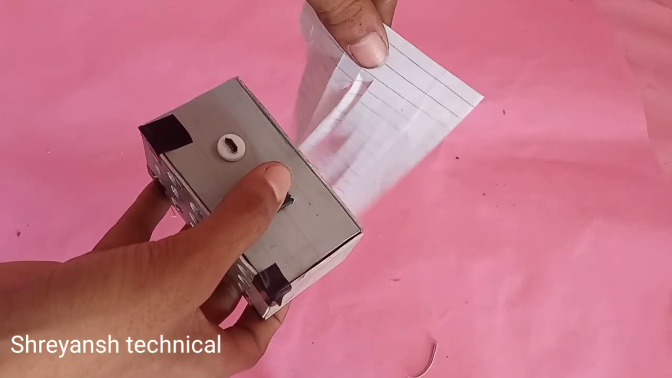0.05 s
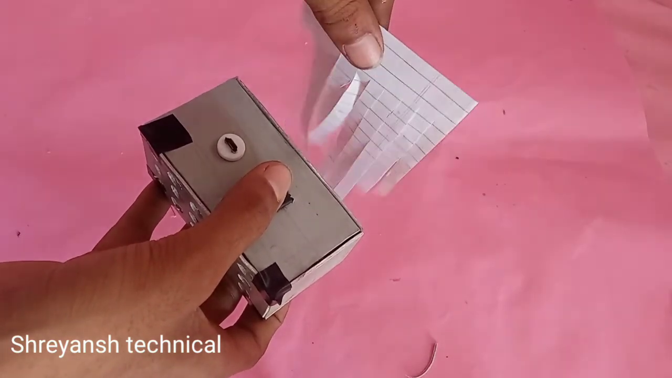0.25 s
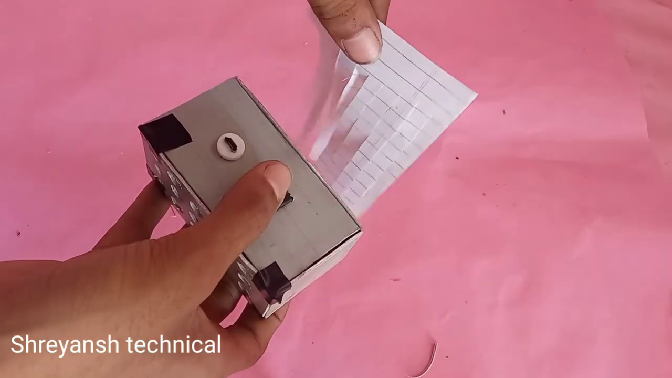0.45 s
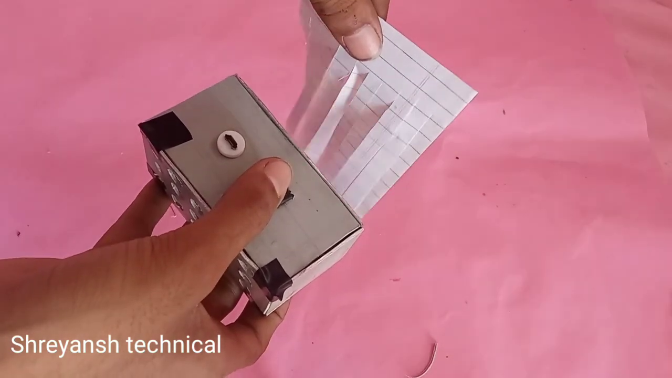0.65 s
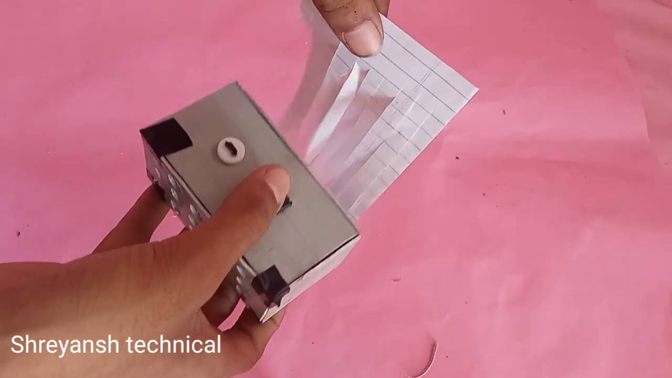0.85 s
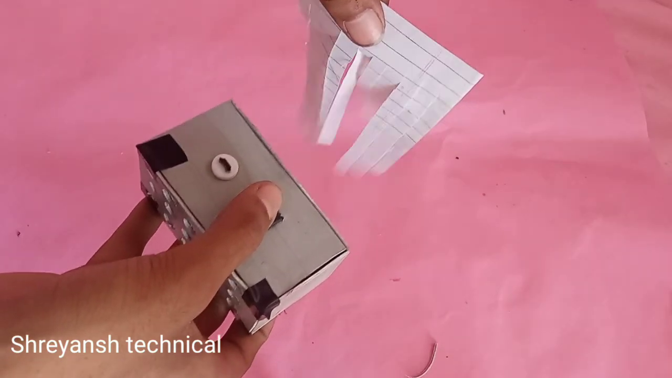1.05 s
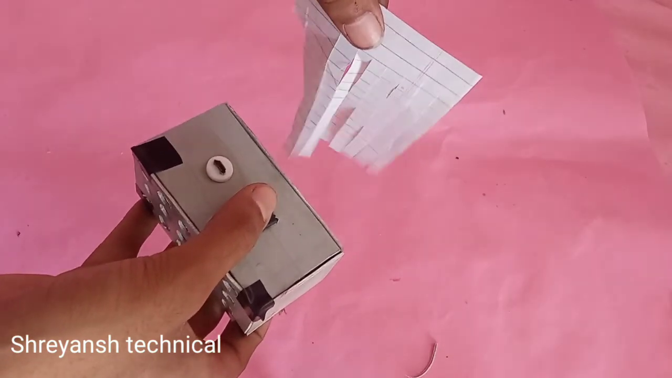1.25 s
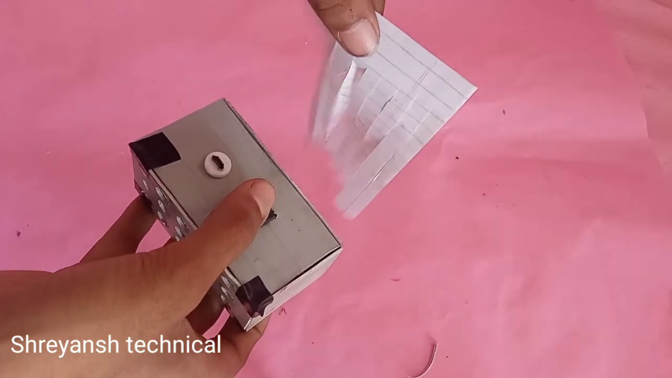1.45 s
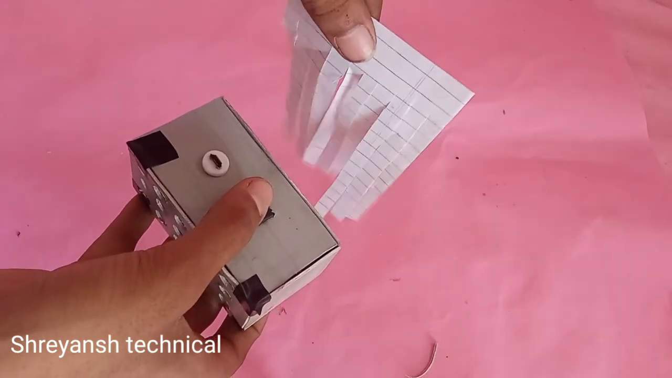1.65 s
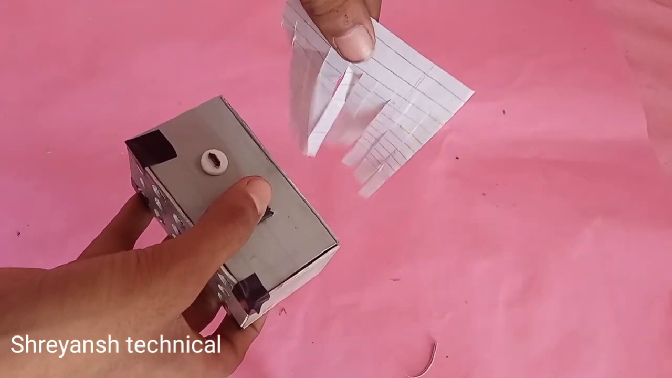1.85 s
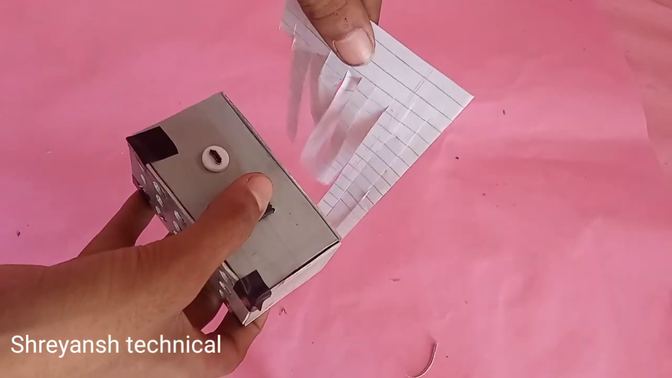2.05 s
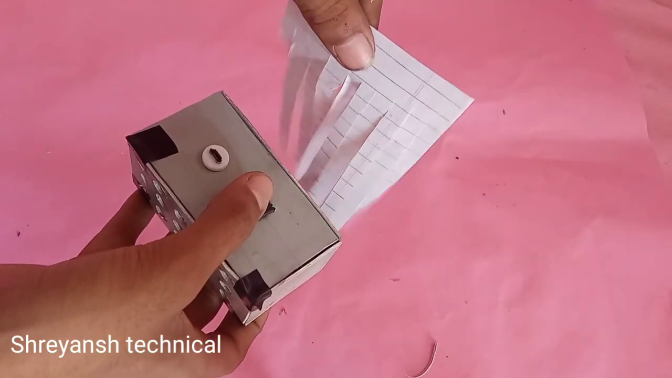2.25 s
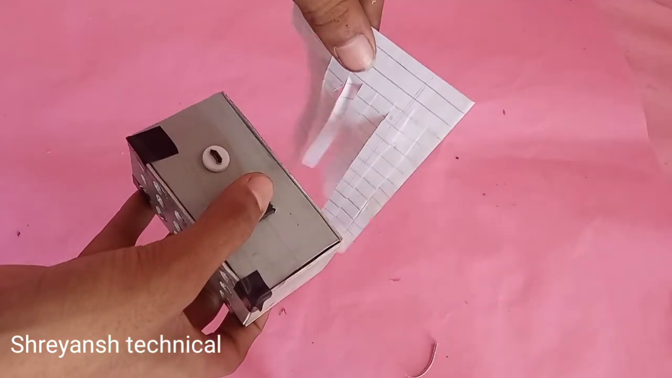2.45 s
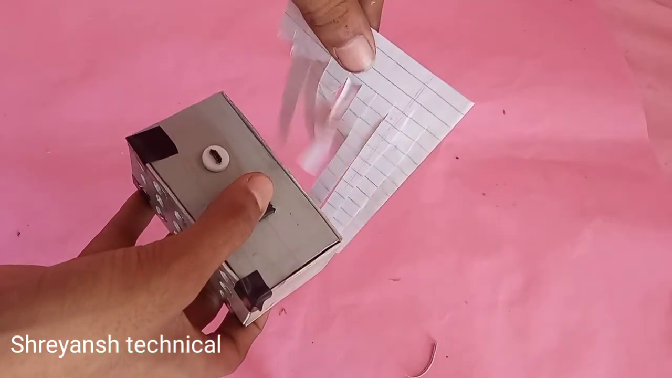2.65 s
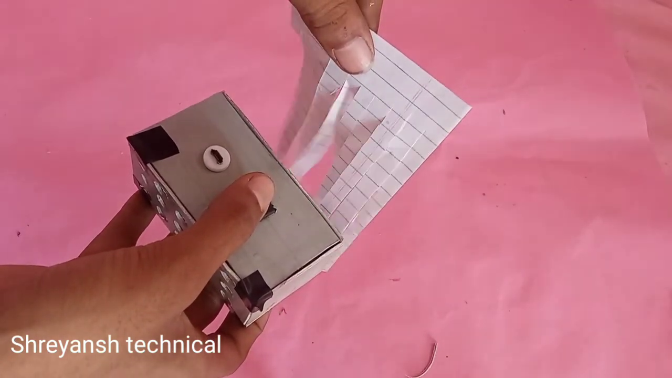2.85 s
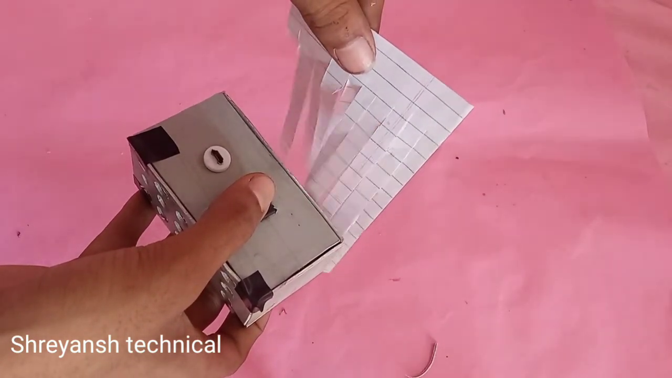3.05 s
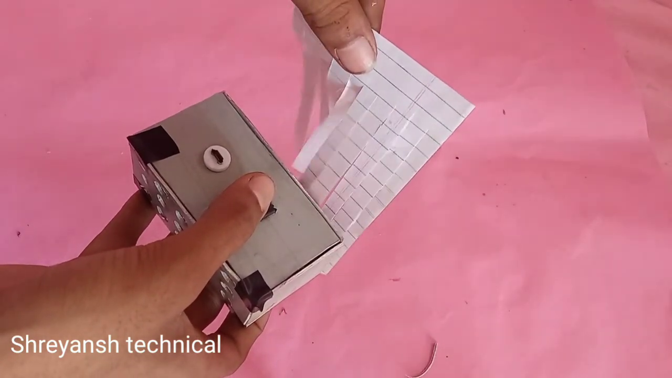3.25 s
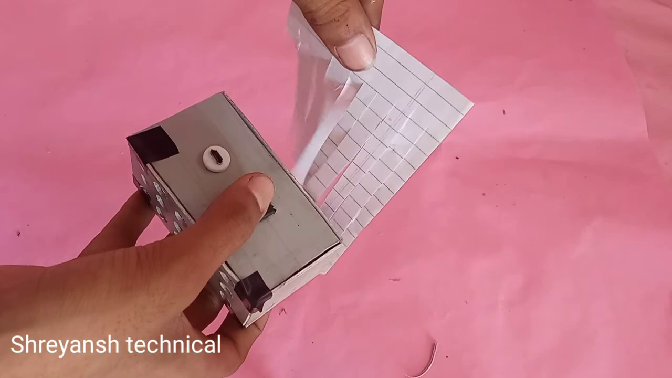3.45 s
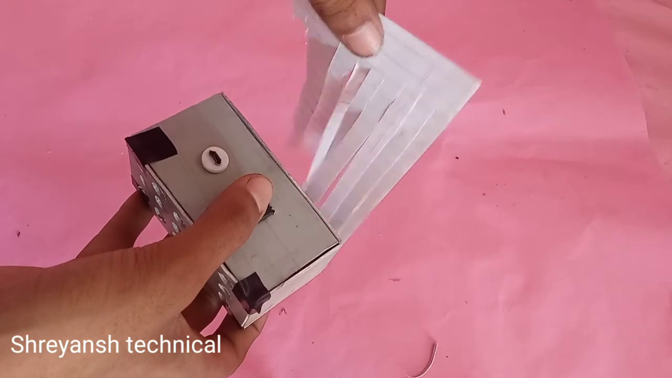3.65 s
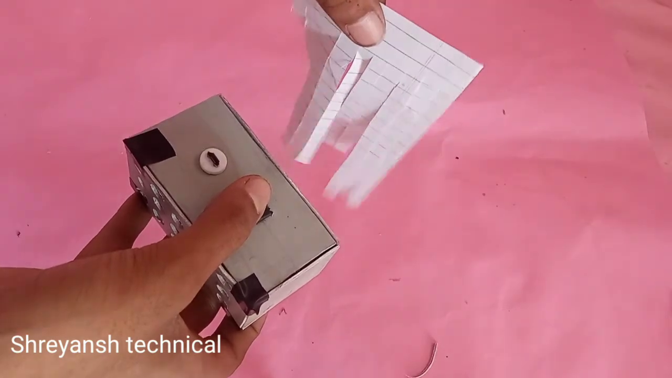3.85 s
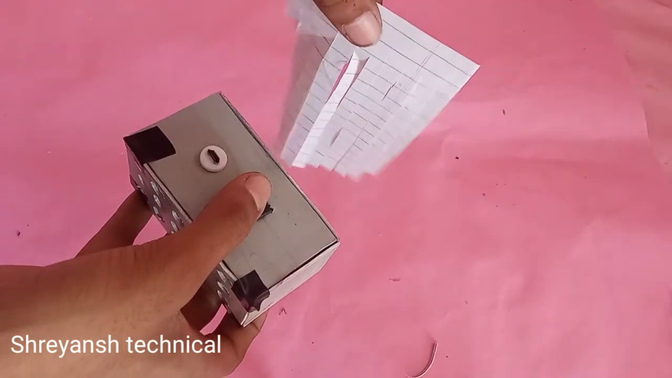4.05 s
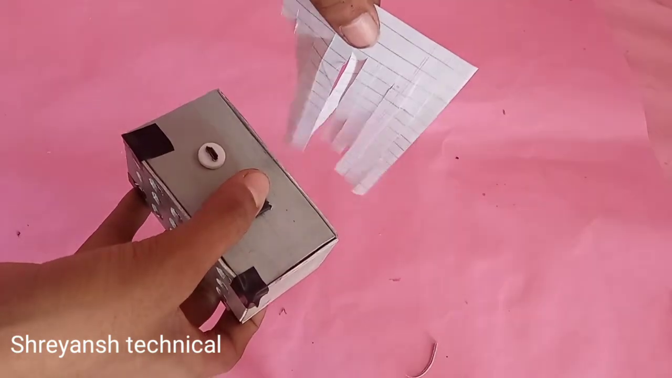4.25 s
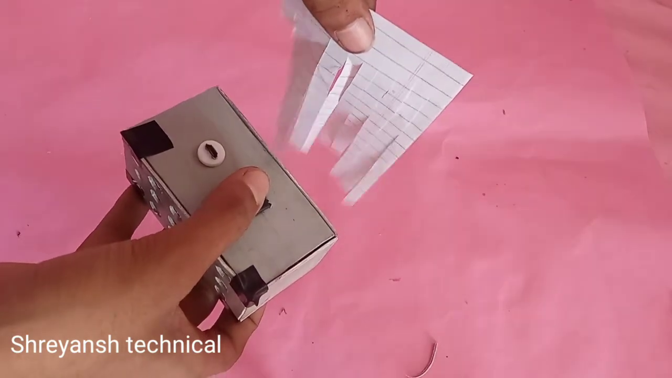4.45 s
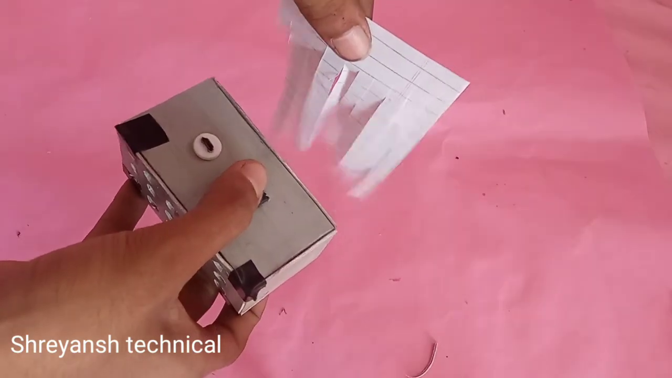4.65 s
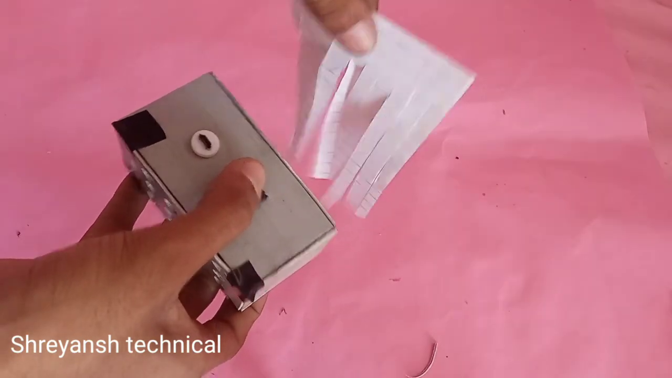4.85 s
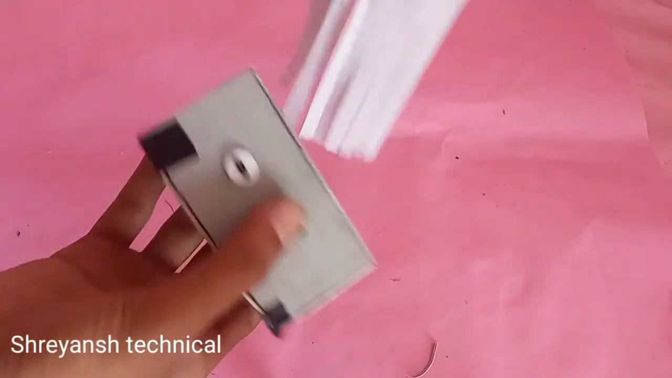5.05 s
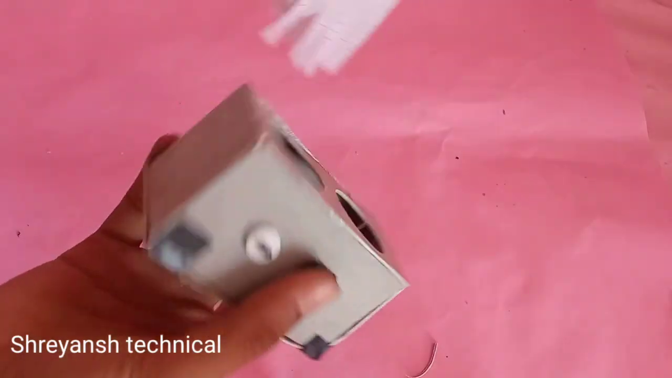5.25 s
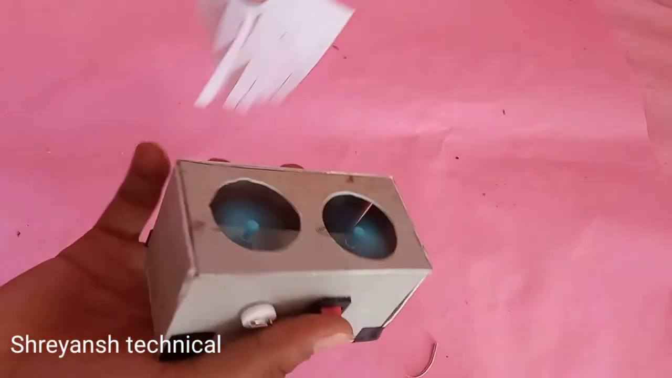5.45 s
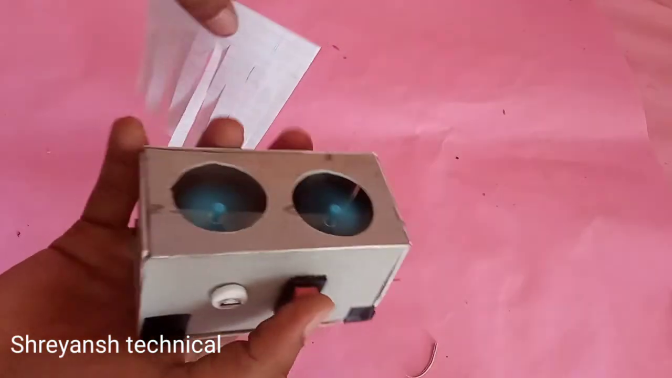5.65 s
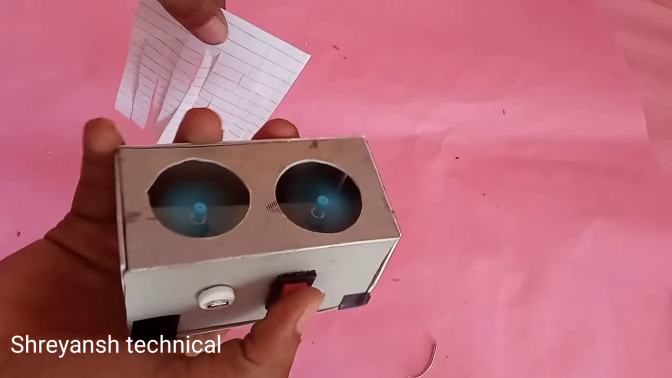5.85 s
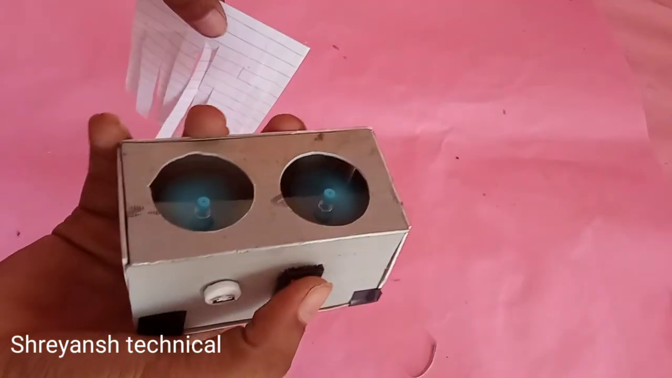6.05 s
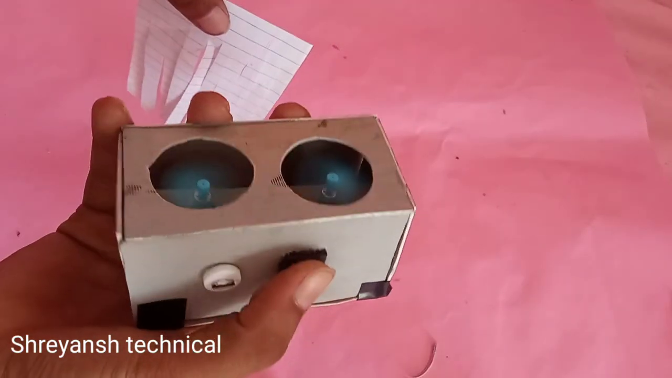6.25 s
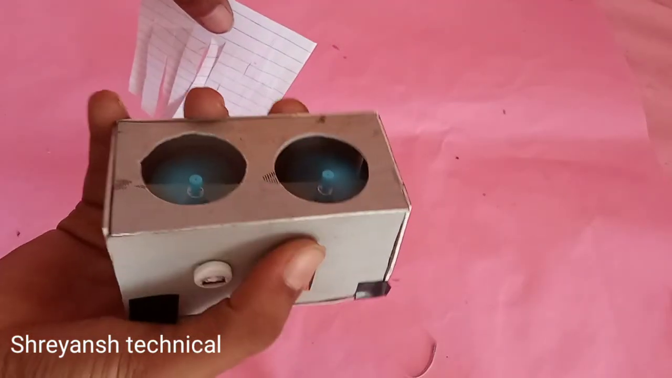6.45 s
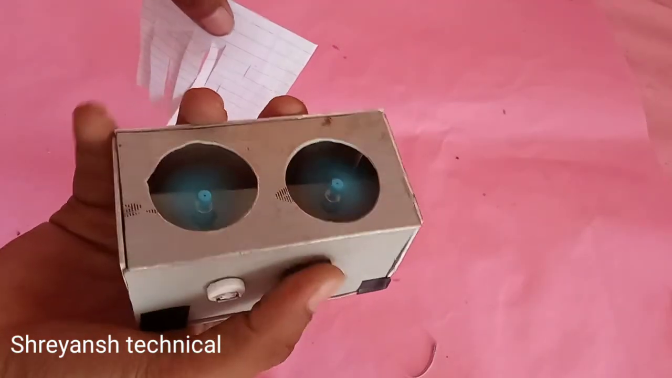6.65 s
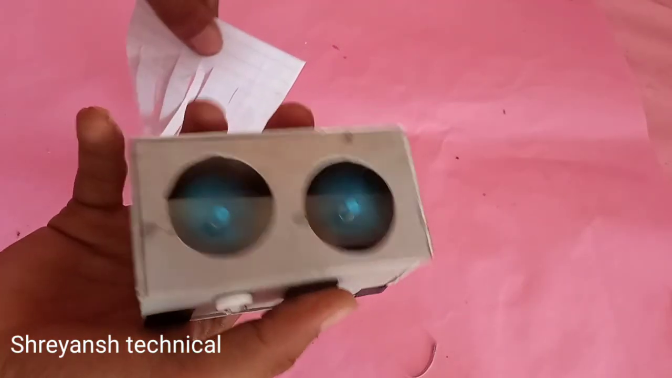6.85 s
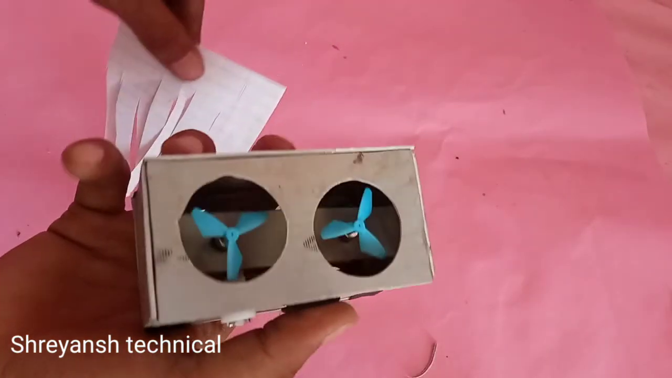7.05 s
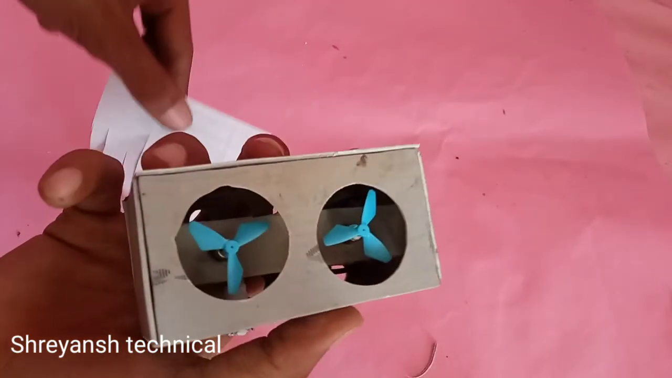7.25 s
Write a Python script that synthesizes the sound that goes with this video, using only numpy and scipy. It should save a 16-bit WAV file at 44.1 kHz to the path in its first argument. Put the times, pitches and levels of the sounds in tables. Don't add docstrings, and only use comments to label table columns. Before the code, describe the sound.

A small twin-fan box buzzes close by with a wavering, beating drone and airy hiss, then snaps off, coasts down and leaves brief paper rustling.

```python
import sys
import numpy as np
from scipy import signal
from scipy.fft import rfft, irfft, next_fast_len
from scipy.io import wavfile
from scipy.ndimage import uniform_filter1d

SR = 44100
rng = np.random.default_rng(int(sys.argv[2]) if len(sys.argv) > 2 else 0)


def put_to_file(sound):
    columns = np.atleast_2d(sound).T
    safe = np.clip(columns, -1, 1)
    whole_steps = np.round(safe * 32767)
    wavfile.write(sys.argv[1], SR, whole_steps.astype(np.int16))


def invert_db(level):
    return 10 ** (np.asarray(level, dtype=float) / 20)


N = 321930
TIME = np.arange(N) / SR
OFF_S = 6.445
AIR_LAW_DB = 50.0


def evened(x):
    return x / np.sqrt(np.mean(abs(x) ** 2) + 1e-20)


def read(points, hz):
    f, value = np.transpose(points)
    return np.interp(np.log(hz + 1), np.log(f + 1), value)


def columns(rows, t=TIME):
    s, *values = np.transpose(rows)
    return [np.interp(t, s, v) for v in values]


def humps_db(table, hz):
    return sum(db / (1 + (2 * (hz - f) / width) ** 2) for f, width, db in table)


def bump(centre_s, half_s):
    return np.exp(-((TIME - centre_s) / half_s) ** 2)


def band(x, lo_hz, hi_hz, order=2):
    return signal.sosfilt(signal.butter(order, [lo_hz, hi_hz], "band", fs=SR, output="sos"), x)


def wander(width_hz, size=N):
    step = max(int(SR / width_hz / 40), 1)
    r = np.exp(-np.pi * width_hz * step / SR)
    white = rng.standard_normal((size // step + 2, 2)) @ [1, 1j]
    z = evened(signal.lfilter([1], [1, -2 * r, r * r], white))
    return np.interp(np.arange(size) / step, np.arange(len(z)), z)


def hiss(field_db, patchy_db, flicker_db):
    frames = N // 128 + 5
    hz = np.fft.rfftfreq(512, 1 / SR)[:, None]
    t = np.arange(frames) * 128 / SR
    a, b, patches = rng.standard_normal((frames, 257, 3)).T
    patches = evened(uniform_filter1d(uniform_filter1d(patches, 8, 0), 14, 1))
    flicker = evened(uniform_filter1d(rng.standard_normal(frames), 8))
    z = (a + 1j * b) * invert_db(field_db(hz, t) + patchy_db * patches + flicker_db * flicker)
    return signal.istft(z, nperseg=512, noverlap=384)[1][:N]


# frequency in Hz, level in dB per Hz.
HOUSE_MURMUR = [(24, -50), (40, -24), (167, -9.5), (203, -4.5), (467, -12), (527, -25), (685, -14),
                (790, -21.5), (1190, -26), (1300, -25), (12000, -46), (15600, -77), (22000, -120)]
# time in seconds, half width in seconds, level in dB.
TABLE_JOLTS = [
    (6.55, .09, -65),
    (6.845, 0.037, -63),
]
# start in seconds, length in seconds, pitch in Hz, width in Hz, level in dB.
HAND_CREAKS = [(7.15, .15, 203, 24.8, -70), (7.19, 0.08, 1170, 30, -85), (7.21, .04, 690, 40, -86),
               (7.27, .03, 740, 60, -92.5), (7.18, .05, 9500, 900, -92), (7.27, .03, 9300, 600, -90),
               (7.25, .05, 4500, 1200, -88), (7.03, .04, 3730, 30, -92), (7.095, .045, 3730, 30, -93),
               (7.06, .06, 1690, 40, -90)]


def room():
    rumble_db, murmur_db = -90, -73.5
    jolt = invert_db(rumble_db) + sum(invert_db(db) * bump(s, half) for s, half, db in TABLE_JOLTS)
    x = jolt * evened(band(rng.standard_normal(N), 60, 95))
    x += invert_db(murmur_db) * evened(hiss(lambda hz, t: read(HOUSE_MURMUR, hz), 2.7, 0.94))
    t = TIME[-SR // 2:]
    for s, length, hz, width, db in HAND_CREAKS:
        swell = np.sin(np.pi * np.clip((t - s) / length, 0, 1))
        creak = (wander(width, size=len(t)) * np.exp(2j * np.pi * hz * t)).real
        x[-SR // 2:] += invert_db(db) * swell * creak
    return np.clip((TIME - 6.45) / 0.05, 0, 1) * x


def walls(x):
    t60_s = 0.32
    taps = np.zeros(SR // 2)
    at = np.arange(500, SR // 2 - 20, 20)
    taps[at + rng.integers(0, 20, len(at))] = rng.choice([-1.0, 1.0], len(at))
    taps *= invert_db(-60 * np.arange(len(taps)) / SR / t60_s)
    return signal.fftconvolve(x, taps / np.linalg.norm(taps))[:N]


# time in seconds, rustle level in dB.
STROKES = [
    (6.56, -55.5),
    (6.66, -59.5),
    (6.74, -57.5),
    (6.755, -56),
    (6.82, -52),
    (6.95, -57.5),
    (7.03, -69),
    (7.06, -86),
    (7.1, -100),
]
# frequency in Hz, level in dB per Hz.
PAPER_HISS = [(300, -13), (550, -11), (1100, -6), (1750, -2), (2500, -5), (4100, -2.5), (5500, -8),
              (7200, -14.5), (8900, -5), (10500, -15), (11800, -25), (12900, -19), (14100, -28),
              (15200, -15)]
# frequency in Hz, width in Hz, level in dB.
SHEET_RINGS = [(543, 45, -5.5), (820, 30, -8), (1105, 81, -0.5), (1780, 120, 3), (3240, 200, 2),
               (4400, 220, -1), (8870, 370, -15)]
# start in seconds, peak in dB.
PAPER_SNAPS = [(6.75, -56), (6.776, -56), (6.795, -54), (6.86, -55), (6.905, -57), (6.922, -54),
               (6.961, -51)]


def rustle():
    stroke_s, light_db = 6.75, 7
    gate_s, gate_db_per_s = 6.965, 500

    def field_db(hz, t):
        light = light_db * (hz > 7500) * (t < stroke_s)
        gate = gate_db_per_s * (hz / 7900.0) ** 2 * np.maximum(t - gate_s, 0)
        return read(PAPER_HISS, hz) + light - gate

    x = hiss(field_db, 1.1, 0.84)
    x /= np.std(band(x, 1000, 11000)[:6 * SR])
    for hz, width, db in SHEET_RINGS:
        ring = (wander(width, size=SR) * np.exp(2j * np.pi * hz * TIME[-SR:])).real
        x[-SR:] += invert_db(db - 10) * ring
    x *= invert_db(columns(STROKES)[0]) * (TIME > STROKES[0][0]) * (TIME < STROKES[-1][0])
    t = np.arange(400) / SR
    for s, db in PAPER_SNAPS:
        noise = band(rng.standard_normal(400), 6000, 15500)
        x[round(s * SR):][:400] += invert_db(db - 6 - 60 * t / 0.012) * noise
    return x


# frequency in Hz, level in dB, 60 dB decay in seconds.
ROCKER = (6.4445, -26, [(3200, -2, .014), (4100, .5, .012), (5200, -1.5, .014), (6300, -6, .008),
          (9000, -8, .006)])


def switch():
    s, db, rings = ROCKER
    t = np.maximum(TIME - s, 0)
    return invert_db(db) * sum(invert_db(d - 60 * t / t60) * np.sin(2 * np.pi * hz * t) for hz, d, t60 in rings)


def coast():
    drag_s, friction_per_s = 0.09, 0.4
    since = np.maximum(TIME - OFF_S, 0)
    speed = np.maximum(1 / (1 + since / drag_s) - friction_per_s * since, 0.01)
    return speed, np.log10(speed)


# time in seconds, share turned to the microphone from 0 to 1.
BOX_TURN = [
    (0, 0.27),
    (1, 0.22),
    (1.2, 0.12),
    (4.9, 0.15),
    (5.15, 0.3),
    (5.4, 0.8),
    (6.4, 1),
    (6.7, .95),
]


def facing(t=TIME):
    return columns(BOX_TURN, t)[0]


# frequency in Hz, level in dB per Hz.
RUSH_AWAY = [(40, -31.5), (70, -28), (160, -11), (500, -10), (900, -7.5), (1400, 0.5), (2050, 4.5),
             (2350, -6), (3200, -10), (4300, -5), (5400, -9.5), (6500, -11), (8200, -21), (13500, -19)]
# frequency in Hz, gain in dB.
FACING_GAIN = [(100, -3.5), (300, 7), (600, 4.5), (950, -3.5), (1400, 0.5), (2050, 1.5), (2800, 2.5),
               (4000, 2.5), (7000, 3), (10000, 8.5), (13000, 5.5), (15000, 8.5)]
# frequency in Hz, width in Hz, gain in dB.
MICROPHONE_PORT = [(9300, 2150, 10.5), (13280, 1100, -10.5), (14900, 1000, 4.5)]


def air(beat):
    full_speed_db = -37

    def field_db(hz, t):
        return read(RUSH_AWAY, hz) + humps_db(MICROPHONE_PORT, hz) + read(FACING_GAIN, hz) * facing(t)

    level_db = full_speed_db + AIR_LAW_DB * coast()[1] - 0.83 * (TIME > OFF_S) + 0.37 * beat
    x = hiss(field_db, 0.79, 0.42)
    return invert_db(level_db) * x / np.std(band(x, 2400, 8000))


# frequency in Hz, width in Hz, gain in dB.
BOX_CAVITY = [(300, 120, -7), (555, 210, -28), (1200, 300, 11), (1520, 380, 13), (1830, 260, -14)]


def glide_db(start_hz, speed, slowing):
    tone_law_db = 92.0
    return tone_law_db * slowing + humps_db(BOX_CAVITY, start_hz * speed) - humps_db(BOX_CAVITY, start_hz)


# time in seconds, half width in seconds, multiple of the blade rate, gain in dB.
OVERTONE_BEAMS = [(.75, 0.32, 6, 5), (1.3, .1, 3, 0), (3.38, .25, 4, 5.5), (3.62, .07, 3, 4),
                  (5.3, 0.18, 5, 12), (5.33, 0.21, 4, 7.5), (5.8, .17, 7, 10.5), (6.3, .22, 5, 9.5)]


def beams_db(multiple):
    return sum(db * bump(s, half) for s, half, which, db in OVERTONE_BEAMS if round(which) == multiple)


# time in seconds, fast fan blade rate in Hz, slow fan lag in Hz.
BLADE_RATE = [(0, 724.5, 22), (.55, 723.5, 20), (1.45, 725, 23), (2.6, 722.5, 21), (3.6, 721.5, 23),
              (3.9, 721.5, 27), (4.3, 720.5, 22), (4.7, 719.5, 20), (4.95, 718, 23), (5.15, 711, 22),
              (5.85, 711, 24), (6.15, 712, 22), (6.3, 720, 23), (6.445, 717, 16)]
# time in seconds, drop in Hz.
CONTACT_SAGS = [(0, 6), (.63, 4), (1.0, 13), (1.28, 3), (1.52, 10), (1.7, 7), (2.28, 7), (2.48, 8),
                (2.78, 5), (3.0, 6), (3.14, 3), (3.4, 6), (3.7, 7), (3.9, 4), (4.1, 3), (4.8, 7), (5.2, 2),
                (5.44, 6), (5.7, 5), (5.92, 6), (6.13, 4)]
# time in seconds, fast tone in dB, slow tone in dB, third blade tones in dB.
BOX_TILT = [(0, -32.5, -42.5, -38), (.95, -34, -41, -36.5), (1.2, -35, -43.5, -32.5),
            (3.6, -36.5, -43, -33.5), (3.9, -35.5, -48.5, -33.5), (4.4, -38, -43.5, -35.5),
            (4.95, -40, -47, -35), (5.08, -37.5, -42, -41), (5.22, -35, -35.5, -32),
            (5.7, -38.5, -36.5, -35), (6.15, -43, -38, -37), (6.35, -38.5, -35, -33.5)]
# multiple, fast fan in dB, slow fan in dB, blur in Hz, gain when facing in dB.
BLADE_OVERTONES = [(2, -45, -51.5, 14, -1), (3, -1.5, -3, 24, 0), (4, -54.5, -52.5, 22, -3),
                   (5, -56.5, -59, 24, -1.5), (6, -49.5, -54, 60, 1.5), (7, -52, -54, 40, -3),
                   (9, -53, -58, 100, 1)]


def propellers():
    sag_half_s, sag_db_per_hz = 0.065, (0.5, 0.23)
    wake_db = 3
    fast_hz, lag_hz = columns(BLADE_RATE)
    *tone_db, third_db = columns(BOX_TILT)
    drop_hz = sum(hz * bump(s, sag_half_s) for s, hz in CONTACT_SAGS)
    speed, slowing = coast()
    toward = facing()
    tones, overtones = np.zeros(N), np.zeros(N)
    shared_sag = 0.35 * wander(13.0).real
    lag_hz = lag_hz - 1.3 * wander(5.0).real
    beat = np.cos(2 * np.pi * np.cumsum(lag_hz * speed) / SR)
    fast_hz = fast_hz - drop_hz
    for fan, hz in enumerate([fast_hz, fast_hz - lag_hz]):
        phase = 2 * np.pi * np.cumsum(hz * speed) / SR + shared_sag
        db = tone_db[fan] - sag_db_per_hz[fan] * drop_hz + wander(9.5).real
        db = db + glide_db(0.92 * hz, speed, slowing)
        tones += invert_db(db) * np.sqrt(2) * (np.exp(1j * phase) * (1 + 0.1 * wander(40.0))).real
        for k, *level_db, blur_hz, facing_db in BLADE_OVERTONES:
            k = round(k)
            gusts = speed ** 2 * wander(blur_hz)
            churn = (0.85 + 0.36 * gusts.real) * np.exp(0.7j * gusts.imag)
            churn = churn + (0.25 + 0.3 * toward) * speed * wander(3 * blur_hz)
            db = level_db[fan] + facing_db * toward + 0.95 * speed * wander(9.0).real
            db = db + beams_db(k) + wake_db * (k > 5) * beat
            if k == 3:
                db = db + third_db + glide_db(3 * hz, speed, slowing)
            else:
                db = db + 2 * AIR_LAW_DB * slowing
            overtones += invert_db(db) * np.sqrt(2) * (np.exp(1j * k * phase) * churn).real
    return tones, overtones, beat


# frequency in Hz, width in Hz, gain in dB.
STANDING_WAVES = [(1140, 30, -5), (1275, 50, -4), (1500, 25, -6), (1645, 50, 3), (1690, 25, -11),
                  (1755, 50, 4), (1800, 20, -9), (1900, 25, -10), (1950, 20, -9), (1995, 35, 5),
                  (2040, 30, -3), (2140, 20, -8), (2225, 40, -7), (2460, 200, -3), (3110, 40, -6),
                  (3390, 60, -5), (4620, 150, -5), (5015, 70, 4), (5480, 80, -5)]


def between_box_and_table(x):
    size = next_fast_len(N + SR)
    gain = invert_db(humps_db(STANDING_WAVES, np.fft.rfftfreq(size, 1 / SR)))
    return irfft(rfft(x, size) * gain, size)[:N]


def scene():
    rush_tail_db, tone_tail_db = -12.5, -14
    tones, overtones, beat = propellers()
    rush = between_box_and_table(air(beat) + overtones) + switch()
    tail = walls(invert_db(rush_tail_db) * rush + invert_db(tone_tail_db) * tones)
    mono = tones + rush + tail + rustle() + room()
    return np.array([mono, mono])


def band_limit(x):
    return signal.sosfilt(signal.butter(12, 16860, fs=SR, output="sos"), x)


def record(dry):
    floor_db, edge_hz = -97, 15500
    x = signal.sosfilt(signal.butter(2, 72, "high", fs=SR, output="sos"), dry)
    x = x + invert_db(floor_db) * rng.standard_normal(N)
    x = signal.oaconvolve(x, signal.firwin(2047, edge_hz, window=("kaiser", 10), fs=SR)[None], "same")
    return band_limit(x)


dry = scene()
out = record(dry)
put_to_file(out)
```